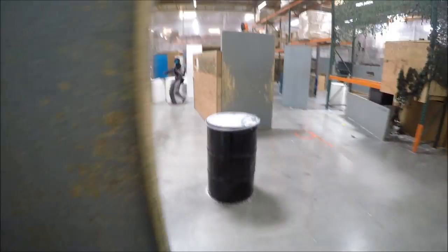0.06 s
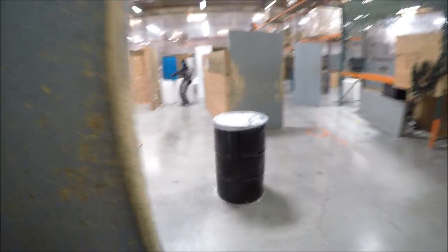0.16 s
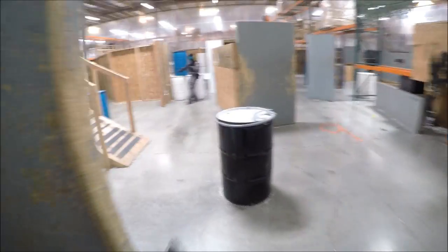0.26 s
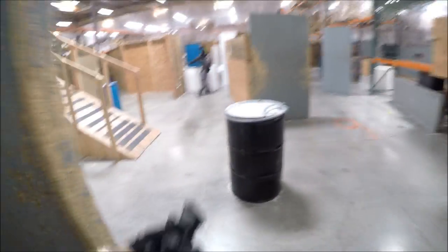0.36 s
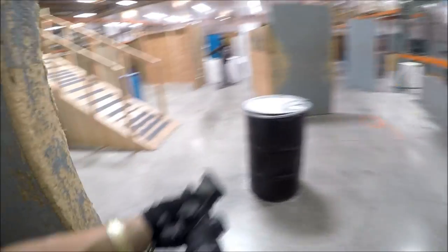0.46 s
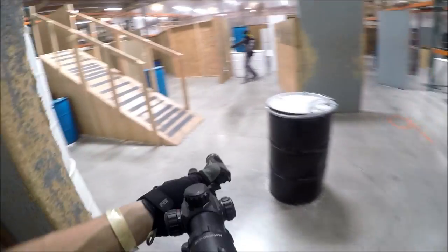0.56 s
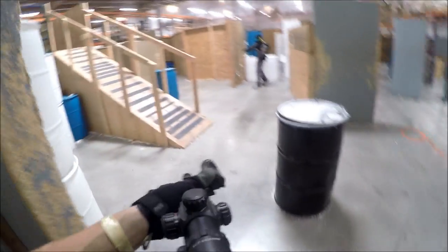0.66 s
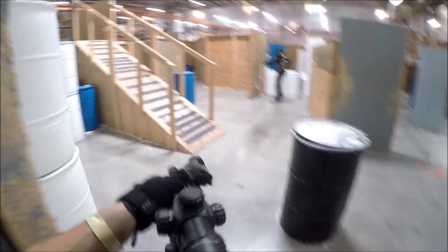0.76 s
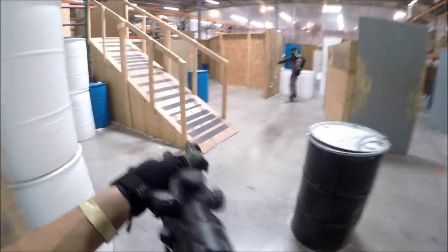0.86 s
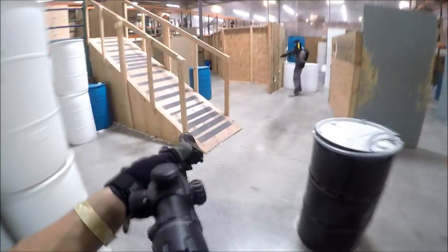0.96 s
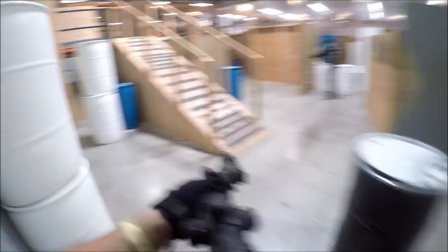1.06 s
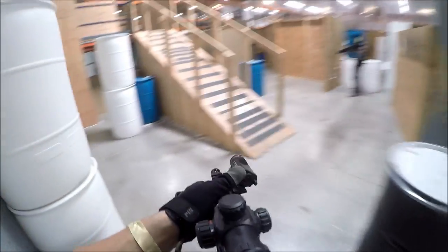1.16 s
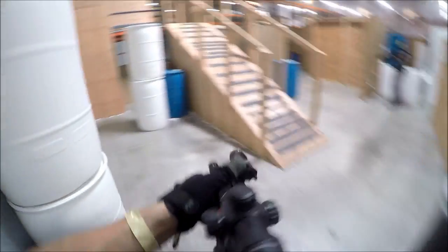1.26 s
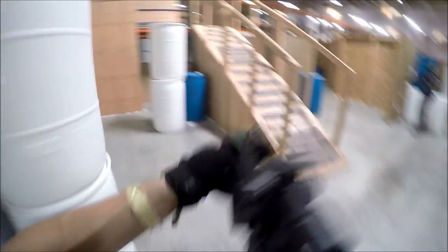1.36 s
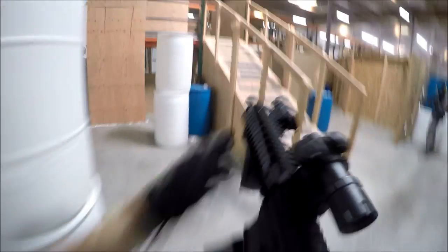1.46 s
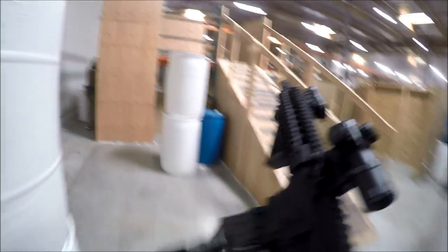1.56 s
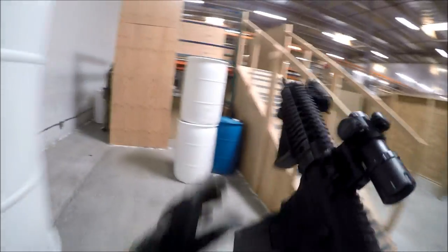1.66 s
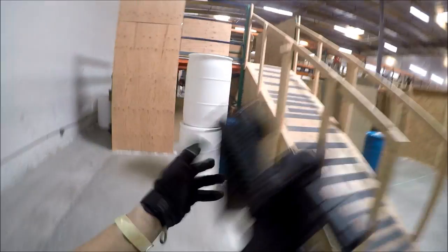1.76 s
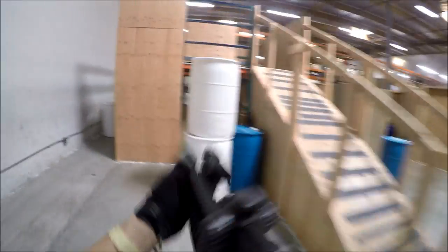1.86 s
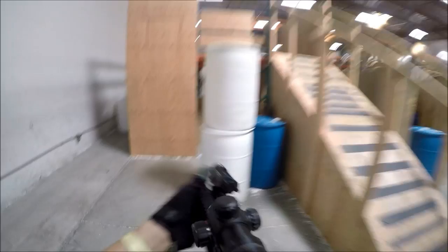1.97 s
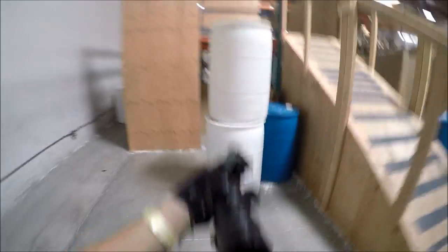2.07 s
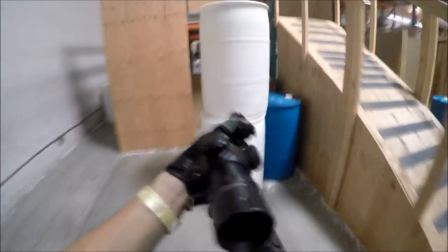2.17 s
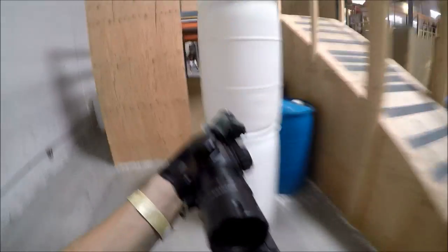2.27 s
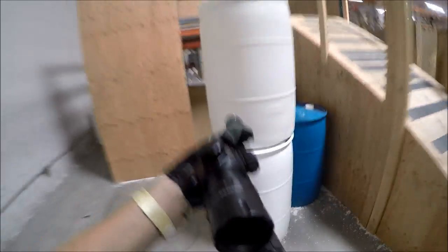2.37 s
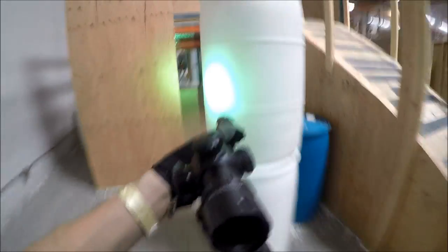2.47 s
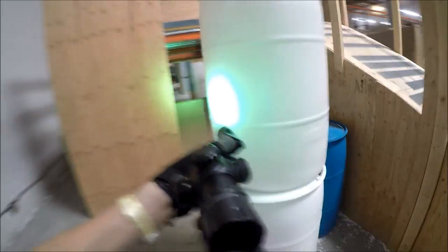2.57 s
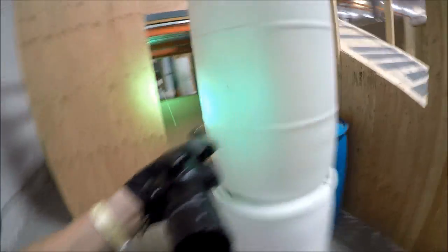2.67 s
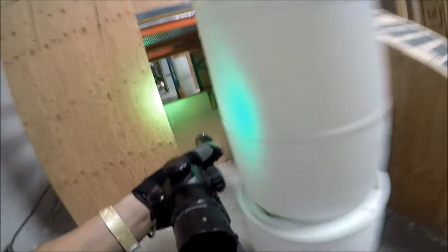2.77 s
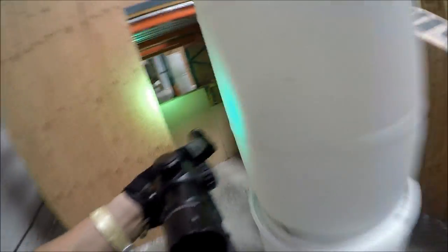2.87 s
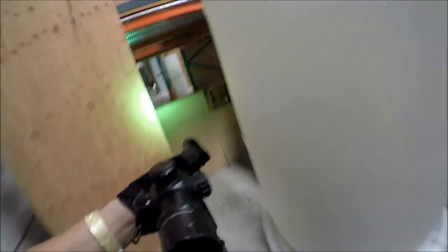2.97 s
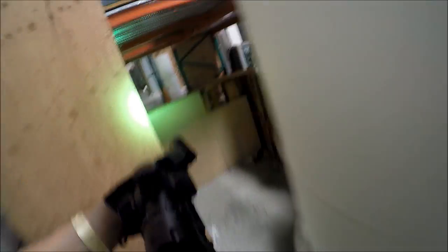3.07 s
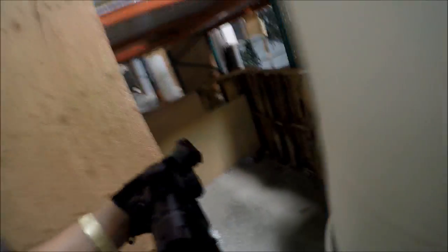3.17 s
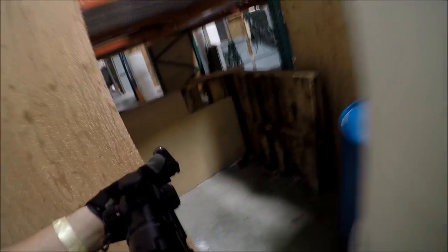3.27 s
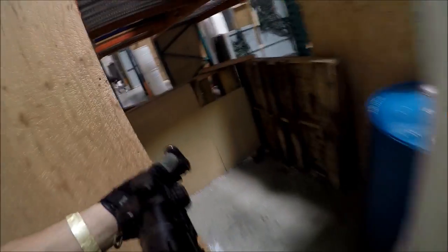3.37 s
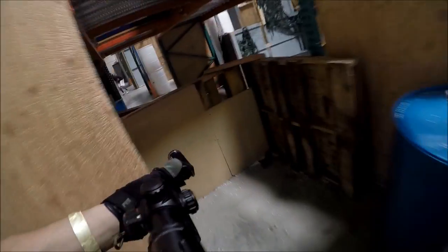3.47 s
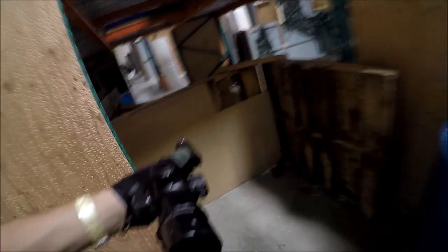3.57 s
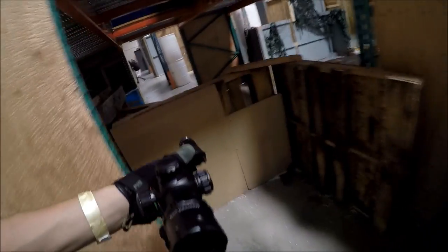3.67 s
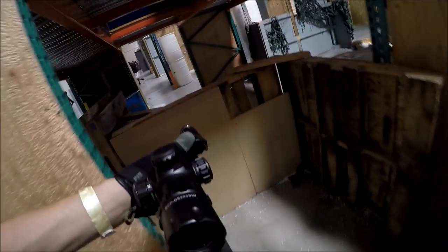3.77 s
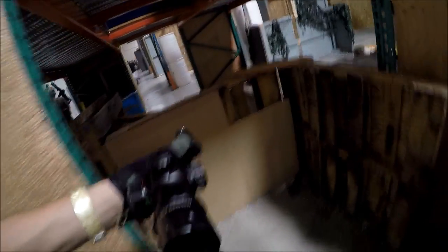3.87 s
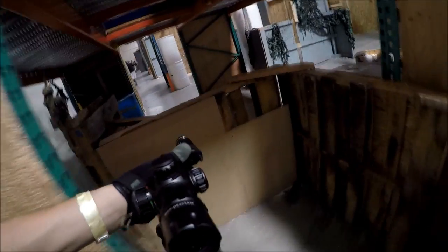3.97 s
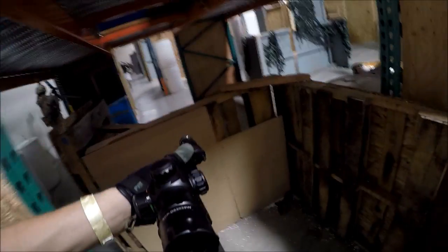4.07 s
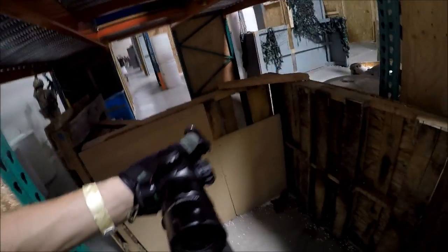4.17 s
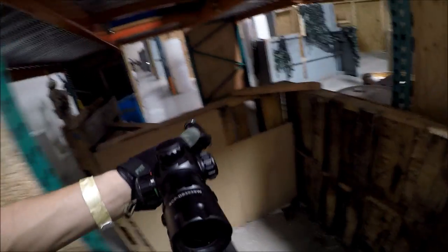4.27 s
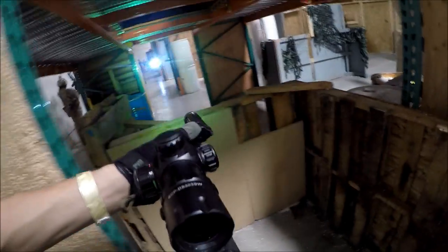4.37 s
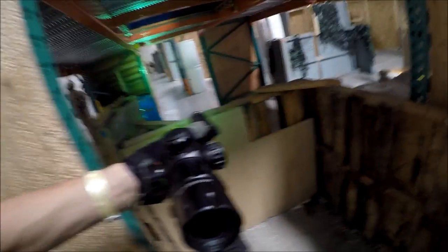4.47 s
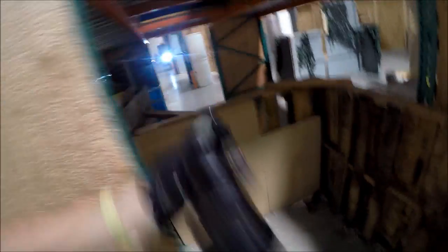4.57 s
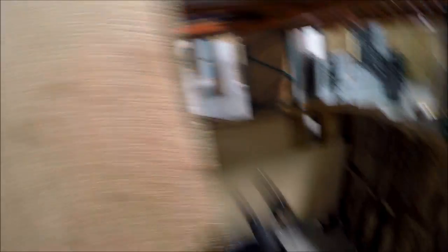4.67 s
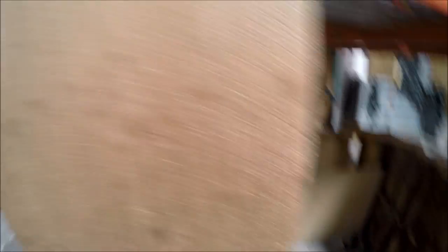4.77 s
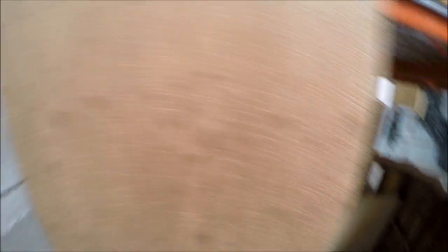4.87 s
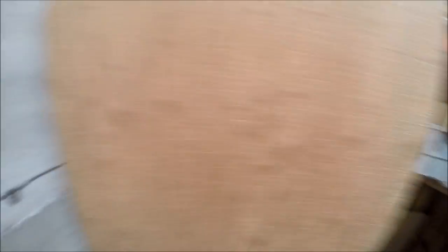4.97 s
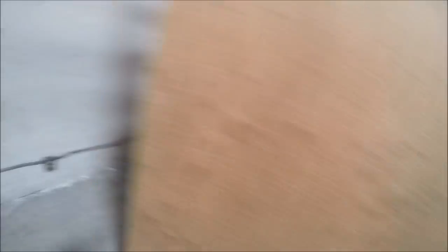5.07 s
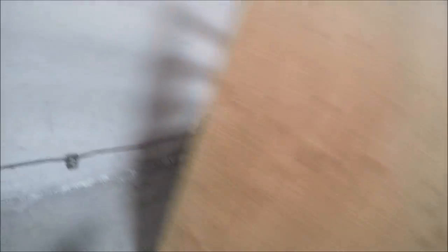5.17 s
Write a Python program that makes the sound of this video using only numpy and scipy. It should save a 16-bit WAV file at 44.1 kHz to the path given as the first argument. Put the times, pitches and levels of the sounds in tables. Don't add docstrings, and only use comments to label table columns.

```python
import sys
import numpy as np
from scipy import signal
from scipy.fft import rfft, irfft, next_fast_len
from scipy.io import wavfile
from scipy.ndimage import uniform_filter1d

SR = 44100
rng = np.random.default_rng(int(sys.argv[2]) if len(sys.argv) > 2 else 0)


def volts_from_decibels(level):
    exponent = np.asarray(level, float) / 20
    return 10 ** exponent


def pcm_store(signal):
    levels = np.round(np.clip(np.atleast_2d(signal), -1, 1) * 32767)
    wavfile.write(sys.argv[1], SR, levels.astype(np.int16).T)


N = 229747

# (frequency [Hz], level [dB])
HALL_COLOUR = [(88, -28), (150, -8.5), (361, -9.5), (624, -8.5), (888, -8.5), (960, -9), (1550, -8.5),
               (1800, -1.5), (2360, 3), (2920, -3.5), (3160, -1.5), (3800, -7), (4050, -16), (5000, -22.5),
               (12700, -34), (14500, -31), (16000, -60)]
# (frequency [Hz], time to fall 60 dB [s])
HALL_T60 = [(400, 2.3), (1000, 6.5), (3000, 5.3), (6000, 2.35), (9000, 2.45), (15000, 0.13)]
# (frequency [Hz], level [dB])
TAIL_COLOUR = [(180, -48), (300, -17.5), (701, -15.5), (856, -5), (1300, -14), (1780, -0.5), (2360, -2),
               (3460, 6), (4160, -7), (7080, -14), (7950, -18.5), (9090, -18), (13800, -16.5), (15000, -20),
               (16000, -25)]
# (top time [s], level [dB], rise time [s], hollow echo over level [dB])
FAR_FIRE = [(0.0, -45.5, 0.02, -2.5), (0.066, -48, 0.021, -1), (0.75, -54, 0.56, -7),
            (1.092, -49, 0.16, -7), (1.5, -48.5, 0.022, -16), (1.587, -42.5, 0.011, 0.5),
            (1.82, -72, 0.033, -24), (1.92, -53, 0.04, -26), (2.305, -44.5, 0.018, -2.5),
            (2.43, -49, 0.15, -5.5), (3.34, -39.5, 0.083, -3.5), (3.58, -40, 0.17, -6),
            (3.814, -45.5, 0.012, 0), (3.896, -39, 0.071, -10.5), (4.018, -41.5, 0.068, -6),
            (4.15, -49.5, 0.12, -10), (4.33, -54.5, 0.69, -5), (4.913, -37.5, 0.016, -13),
            (5.08, -38.5, 0.11, -6.5), (5.19, -54, 0.1, -15)]
# (frequency [Hz], level [dB])
FAR_FIRE_COLOUR = [(880, -25), (1500, -12.5), (1770, 0.5), (2890, 3), (3400, 6.5), (4120, -9.5),
                   (5200, -13), (6680, -15), (7940, -29.5), (11000, -26.5), (15000, -66)]
# (top time [s], level [dB], rise time [s])
RUB = [(0.06, -67, .02), (0.27, -72, .012), (0.97, -62.5, 0.11), (1.12, -60, 0.037), (1.392, -62, 0.0056),
       (1.5, -61, 0.033), (1.553, -53.5, 0.0074), (1.585, -65, 0.013), (1.71, -61.5, 0.0067),
       (1.806, -64, 0.0024), (1.813, -46, 0.0012), (1.821, -69, 0.004), (1.835, -58, .003),
       (1.85, -65, 0.049), (1.875, -61, .003), (1.888, -58, .004), (1.912, -52, .002), (1.918, -52, .003),
       (1.928, -53, 0.0035), (1.938, -52, 0.0027), (1.947, -52, .002), (1.953, -52, .002),
       (1.972, -52, .002), (1.99, -56.5, .002), (2.305, -58.5, .015), (2.42, -63.5, 0.11),
       (3.58, -63, 0.086), (3.815, -65, 0.0098), (3.901, -72, 0.062), (4.03, -75, 0.034), (4.8, -77, .03),
       (4.917, -44.5, 0.029), (5.08, -60.5, 0.071), (5.2, -62, 0.033)]
# (frequency [Hz], level [dB])
RUSTLE_COLOUR = [(3000, 7), (6500, 15), (8000, -3), (10500, 10.5), (12500, 4.5), (14000, -4), (15500, -3)]
# (start [s], end [s], frequency [Hz], level [dB])
SQUEAK = [
    (-0.1, 0.253, 3810, -54),
    (1.416, 1.483, 2262, -41.5),
    (1.528, 1.575, 2205, -43),
    (1.69, 1.77, 2220, -44),
    (3.904, 4.218, 905, -52),
]
# (top time [s], level [dB], rise time [s])
SWAY = [(0.038, -22, 0.047), (0.27, -29, 0.068), (0.4, -28.5, 0.1), (0.8, -24, 0.064), (0.93, -25.5, 0.072),
        (1.04, -24.5, 0.13), (1.187, -20, 0.034), (1.38, -39, 0.31), (1.62, -18.5, 0.085),
        (1.99, -23, 0.11), (2.2, -23, 0.054), (2.289, -14, 0.045), (2.477, -21, 0.061), (2.68, -22.5, 0.11),
        (2.8, -15.5, 0.036), (2.95, -19.5, 0.068), (3.08, -23.5, 0.13), (3.36, -20, 0.086),
        (3.6, -22.5, 0.096), (3.747, -19.5, 0.018), (3.84, -27, 0.037), (3.991, -23, 0.064),
        (4.105, -20.5, 0.016), (4.25, -31.5, 0.081), (4.53, -24, 0.071), (4.658, -25.5, 0.021),
        (4.783, -24.5, 0.072), (4.961, -17.5, 0.043), (5.15, -28.5, 0.28)]
# (top time [s], level [dB])
JOLT = [(0.04, -39), (0.25, -54), (0.36, -44), (0.47, -48), (0.59, -41), (0.72, -39), (0.79, -31.5),
        (1.04, -30), (1.139, -28), (1.19, -34.5), (1.59, -33), (1.66, -35.5), (1.77, -46), (1.88, -34),
        (1.99, -41), (2.259, -16.5), (2.33, -30), (3.268, -25), (3.361, -24), (3.49, -30), (3.6, -37),
        (3.806, -21), (3.95, -33), (4.03, -31.5), (4.12, -33.5), (4.245, -27), (4.38, -36), (4.8, -33),
        (4.972, -31), (5.06, -37)]
# (time [s], peak [dB], pitch [Hz], upper rattle over peak [dB], thump over peak [dB])
KNOCK = [(0.5878, -29.5, 308, -2.5, -8), (1.0155, -26.5, 795, -5, -6), (1.0186, -25, 352, -25, -40),
         (1.578, -47.5, 290, 21.5, -29), (1.758, -38.5, 970, -9, -25), (2.013, -33.5, 880, 8.5, -26),
         (2.2205, -21, 513, 1.5, -10), (2.2262, -21, 790, -20, -29), (2.2325, -26, 706, 1, -17),
         (2.297, -37, 286, 13.5, -2), (2.798, -27, 686, 16, -29), (3.2472, -17, 780, -3, -17),
         (3.2664, -20.5, 1136, -47, -3.5), (3.795, -29, 825, -4, 6.5), (3.935, -29, 960, -6, -5),
         (4.6788, -28, 1060, -1, 6)]
# (time [s], peak [dB], pitch [Hz])
TICK = [(3.2668, -19.5, 1050), (4.9105, -24.5, 4910), (1.162, -36, 3430), (1.4267, -38, 4600),
        (1.579, -33, 2400), (1.393, -44, 4600), (1.501, -46, 7000), (1.513, -45, 5900), (1.518, -47, 7340),
        (1.8195, -32.5, 3700), (2.0477, -27, 3370), (3.8656, -35, 3660), (4.9083, -21, 2480),
        (4.9323, -21.5, 1740), (5.0054, -14, 3420)]
# (frequency [Hz], level [dB], time to fall 60 dB [s])
GEAR = [(390, -18, 0.046), (621, -9, 0.088), (736, 2.5, 0.021), (1000, -5, 0.019), (1140, 4, 0.019),
        (1345, -51, 0.017)]
# (time [s], peak [dB], brightness [dB per octave], thump [dB], spray over peak [dB])
PELLET = [
    (1.1109, 0, 1.5, -64, -9),
    (2.245, 2.5, 3.5, -11.5, 4),
    (4.7029, 1, 4.5, -62, -3.5),
    (4.7096, -10, -7.5, -57, -19),
]
# (frequency [Hz], level [dB], time to fall 60 dB [s])
BOARD = [(970, -7, 0.009), (1335, -24, .01), (1950, -3, 0.013), (2260, -8, 0.012), (2700, -10, 0.004),
         (3110, -5, 0.008), (3670, -7, 0.009), (5190, -15, 0.007), (6000, -16, 0.006), (7700, -19, 0.004),
         (12400, -17, 0.004)]
# (time [s], dull level [dB], bright level [dB])
REBOUND = [(2.505, -32, -45), (2.5153, -35, -42), (2.643, -21, -29), (2.655, -39, -41), (2.6684, -32, -45),
           (2.7728, -27, -30), (2.7855, -30, -33), (2.791, -35, -30), (2.8952, -33, -30), (2.905, -30, -36),
           (2.9147, -37, -26), (2.928, -28, -45), (3.036, -28, -24), (3.0446, -33, -29),
           (3.0547, -29.5, -25), (3.152, -21, -28), (3.167, -26, -23.5), (3.177, -21.5, -28),
           (4.5393, -10, -29), (4.5613, -43, -25), (4.5691, -31, -31), (4.651, -14.5, -28),
           (4.672, -34, -34), (4.688, -22, -31)]
# (frequency [Hz], level [dB], time to fall 60 dB [s])
ACTION_DULL = [(2030, -30, 0.019), (3067, -1.5, 0.029), (3720, -14, 0.022)]
# (frequency [Hz], level [dB], time to fall 60 dB [s])
ACTION_BRIGHT = [(5500, -6, .006), (7250, -8, .006), (8830, -11, .005), (12600, -6, .004),
                 (15000, -10, .005)]
# (frequency [Hz], level [dB])
LOOSE_PART = [(2150, 11), (2900, 3), (3450, 11), (4480, -5), (5500, -9), (7250, -10.5), (8830, -7),
              (12600, -2), (15000, 2)]
# (time [s], level [dB], low ring over level [dB])
SLAM = [(2.4435, -30, -9), (2.4712, -26, 0), (2.6255, -25, -4), (2.7515, -25, -9), (2.7545, -21, -3),
        (2.879, -19, -6), (3.0165, -31, -5), (3.1411, -30, -3), (2.4761, -18, 0), (2.4793, -17, -2),
        (2.4827, -16, 4), (2.4856, -18, -9), (2.4889, -15, 1), (2.631, -17.5, 11.5), (2.6336, -20, -8),
        (2.636, -7.5, -3), (2.6401, -16, -7), (2.6481, -16, -4), (2.7577, -17, 2), (2.7606, -12, -1),
        (2.7655, -19, -1), (2.7678, -17, -6), (2.8834, -11.5, -5), (2.886, -22, 2), (2.8896, -13, -2),
        (3.0223, -18, -5), (3.0256, -16, -10), (3.03, -10.5, -5), (3.0368, -24, -2), (3.1343, -28, 6),
        (3.1457, -20, 1), (3.1558, -18.5, 4), (3.1604, -20, 2), (3.1728, -26, -5), (4.5317, -31, -5),
        (4.5362, -7.5, 1), (4.5415, -16, -11), (4.5444, -21, -11), (4.5489, -24, -8), (4.5555, -27, -7),
        (4.6049, -29, 3), (4.638, -22, -7), (4.6413, -11, 6), (4.6453, -9.5, -5), (4.648, -12, -8),
        (4.6542, -17, -4), (4.6574, -15, -2), (4.6637, -27, -3), (4.724, -27, 6)]
# (frequency [Hz], level [dB], time to fall 60 dB [s], share of the low ring column [0 to 1])
SLAM_MODES = [(2160, -6, 0.01, 0.94), (2860, -11, 0.027, 0.51), (3110, -12.5, 0.024, 0.1),
              (3390, -7, 0.013, 0.01), (5600, -21, 0.0086, 0.01)]
# (time [s], level [dB], pitch [Hz])
TAP = [(0.592, -27, 337), (0.595, -34, 332), (1.158, -38, 330), (2.246, -21, 470), (2.249, -20, 292),
       (3.267, -24, 1040), (4.679, -23, 1040), (2.4449, -37, 910), (2.45, -22, 1270), (2.4593, -29, 695),
       (2.4783, -30, 1000), (2.4831, -22, 1110), (2.5992, -32, 1100), (2.6053, -24, 786), (2.617, -36, 800),
       (2.6321, -19.5, 1010), (2.6377, -23, 1000), (2.6456, -32, 800), (2.7305, -23.5, 904),
       (2.7331, -38, 690), (2.7561, -36, 810), (2.8545, -18.5, 726), (2.861, -31, 680), (2.8681, -35, 900),
       (2.8813, -28, 905), (2.9952, -32, 900), (2.9993, -30, 740), (3.0221, -23.5, 1080), (3.026, -41, 800),
       (3.0295, -29, 1000), (3.1176, -22, 800), (3.1255, -25, 750), (3.1449, -17.5, 775),
       (3.1508, -21, 720), (4.5044, -24, 1000), (4.5083, -47, 800), (4.532, -42, 970), (4.613, -38, 920),
       (4.6163, -33, 695), (4.6394, -35, 1000), (4.7195, -32, 900)]
# (time [s], peak [dB], thump [dB], leak over peak [dB],
# clack over peak [dB])
VALVE = [
    (2.448, -12, -20, -11, -8),
    (2.6026, -13, -16.5, -8.5, -7.5),
    (2.728, -13.5, -18.5, -10, -11),
    (2.8513, -15, -19, -5.5, -7),
    (2.9922, -14, -16.5, -9, -6.5),
    (3.1152, -15, -18, -8, -6),
    (4.465, -17, -44, -4, -42),
    (4.5019, -13.5, -23.5, -12, -15),
    (4.61, -15, -23.5, -5, -11),
]
# (frequency [Hz], level [dB])
VALVE_COLOUR = [(180, -59), (300, -25), (614, 3), (1480, -15), (2100, 11.5), (4910, 2), (7320, -3),
                (8360, -17), (12700, -7.5), (15000, -25), (16000, -40)]
# (time [s], peak [dB], muzzle crack over peak [dB], swell time [s], thump [dB])
BLAST = [
    (2.478, -9, 4, 0.0079, -24),
    (2.6324, -10, 12.5, 0.005, -24),
    (2.7583, -9.5, 17.5, 0.0078, -25),
    (2.8818, -11, 19, 0.0095, -27),
    (3.0226, -10, 16.5, 0.0061, -25),
    (3.1454, -10, 16.5, 0.0069, -22.5),
    (4.5314, -7, 6.5, 0.0098, -31.5),
    (4.6404, -7, 11.5, 0.009, -30),
]
# (frequency [Hz], level [dB])
BLAST_COLOUR = [(180, -10), (300, -37), (425, -22), (1480, -13.5), (2140, 2), (2480, -2), (3460, 3.5),
                (4160, -4), (5700, -3.5), (8090, -11.5), (8790, -13.5), (9710, -13.5), (13300, -8.5),
                (15000, -8), (16000, -13)]
# (resonance [Hz], width [Hz], level of the added resonance [dB])
PORT = [(5500, 400, -4), (7200, 300, -2), (8800, 400, -2), (12600, 600, -5), (15000, 300, 4)]


def rms_one(x):
    return x / np.sqrt(np.mean(x ** 2) + 1e-20)


def at_hz(points, hz):
    table_hz, value = np.transpose(points)
    return np.interp(np.log(hz), np.log(table_hz), value)


def lowpass(x, order, hz):
    return signal.sosfilt(signal.butter(order, hz, fs=SR, output="sos"), x)


def highpass(x, order, hz):
    return signal.sosfilt(signal.butter(order, hz, "high", fs=SR, output="sos"), x)


def clicks(times, heights):
    out = np.full(N, 1e-18)
    at = (np.asarray(times) * SR).astype(int)
    np.add.at(out, np.clip(at, 0, N - 1), heights)
    return out


def fade(x, t60):
    return signal.lfilter([1], [1, -volts_from_decibels(-60 / (t60 * SR))], x)


def ring(x, hz, t60):
    r = volts_from_decibels(-60 / (t60 * SR))
    w = 2 * np.pi * hz / SR
    return signal.lfilter([0, np.sin(w)], [1, -2 * r * np.cos(w), r * r], x)


def noise(colour):
    size = next_fast_len(N, True)
    hz = np.maximum(np.arange(size // 2 + 1) * SR / size, 1)
    spectrum = rfft(rng.standard_normal(size)) * volts_from_decibels(at_hz(colour, hz))
    return rms_one(irfft(spectrum, size)[:N])


def flicker(rate_hz, depth_db):
    r = np.exp(-2 * np.pi * rate_hz / SR)
    slow = signal.lfilter([1], [1, -2 * r, r * r], rng.standard_normal(N + SR))[SR:]
    return volts_from_decibels(depth_db * rms_one(slow))


def swells(top_s, level_db, rise_s, rest_db=-100):
    t = np.arange(0, N + 64, 64) / SR
    rise_s = np.clip(rise_s + 0 * top_s, .002, 1)
    u = np.maximum(1 + (t - np.c_[top_s]) / np.c_[rise_s], 0)
    shape = (u * np.exp(1 - u)) ** 4
    power = volts_from_decibels(2 * rest_db) + np.sum(volts_from_decibels(2 * np.c_[level_db]) * shape, axis=0)
    return np.interp(np.arange(N) / SR, t, np.sqrt(power))


def swing(colour, slack):
    x = noise(colour)
    height = np.abs(signal.hilbert(x, next_fast_len(N))[:N])
    return rms_one(x / (height + slack))


def thump(times, level_db, hz, t60):
    soft = signal.lfilter([.02], [1, -.98], clicks(times, volts_from_decibels(level_db)))
    return ring(soft, hz, t60)


def clack(times, level_db, length_s, tilt_db=0.):
    scatter_db = rng.normal(0, 2.5, (len(times), len(GEAR)))
    contacts = rng.standard_normal(N) * (rng.random(N) < 900 / SR)
    out = 0
    for k, (hz, mode_db, t60) in enumerate(GEAR):
        height_db = level_db + mode_db + scatter_db[:, k] + tilt_db * np.log2(hz / 600)
        blow = clicks(times, volts_from_decibels(height_db))
        out = out + ring(blow + .5 * fade(blow, length_s) * contacts, hz, t60)
    return out


def hall():
    fan_hz, fan_db, nearest_s = 222, -65.5, 1.5
    hum = np.sin(2 * np.pi * fan_hz * np.arange(N) / SR) * flicker(2.5, 0.85)
    hum = hum * swells(np.array([nearest_s]), np.array([fan_db]), 0.94, fan_db - 3.5)
    wash = highpass(noise(HALL_COLOUR), 2, 170)
    return volts_from_decibels(-47) * rms_one(wash) * flicker(7.2, 1.0) + hum


def far_fire():
    s, far_db, rise_s, hollow_db = np.transpose(FAR_FIRE)
    hollow_hz, hollow_t60_s = 1177, 0.0048
    once = ring(rng.standard_normal(N), hollow_hz, hollow_t60_s)
    boards = rms_one(ring(once, hollow_hz, hollow_t60_s))
    direct = swells(s, far_db + 2.5, rise_s) * noise(FAR_FIRE_COLOUR)
    echo = swells(s, far_db + hollow_db, 1.04 * rise_s) * boards
    return (direct + echo) * flicker(42, 1.33)


def rustle():
    return swells(*np.transpose(RUB)) * noise(RUSTLE_COLOUR) * flicker(60, 3) * flicker(500, 5.5)


def squeaks():
    wander = .022
    t, out = np.arange(N) / SR, 0
    for start, end, hz, level_db in SQUEAK:
        swell = np.sin(np.pi * np.clip((t - start) / (end - start), 0, 1))
        drift = wander * np.cumsum(rng.standard_normal(N))
        out = out + volts_from_decibels(level_db) * swell * np.sin(2 * np.pi * hz * t + drift)
    return out


def shake():
    deep = swing([(10, -2.5), (21, 17.0), (28, 17.5), (36, 12.5), (55, -36), (300, -120)], slack=0.37)
    upper = swing([(10, -65), (38, -23.0), (50, 7.0), (75, -7.5), (110, -14.0), (150, -18.5),
                   (260, -41.5), (1000, -110)], slack=0.34)
    shot_s, _, _, _, shot_thump_db = np.transpose(BLAST)
    steps = swells(*np.transpose(JOLT), 0.021, rest_db=-46)
    recoil = swells(shot_s, shot_thump_db + 1.5, 0.029)
    sway = swells(*np.transpose(SWAY), rest_db=-43)
    return lowpass(sway * deep + volts_from_decibels(-1.0) * (steps + recoil) * upper, 4, 320)


def knocks():
    s, peak_db, _, upper_db, low_db = np.transpose(KNOCK)
    rattle = noise([(1200, -58), (1800, -3), (2300, 4.0), (3200, -24.0), (9000, -26), (20000, -80)])
    out = clack(s + 0.001, peak_db - 13.0, 0.03, tilt_db=0.5)
    out += thump(s, peak_db + low_db + 9.5, 123.0, 0.045)
    out += fade(clicks(s, volts_from_decibels(peak_db + upper_db - 9.5)), 0.036) * rattle
    for s, peak_db, hz, *_ in KNOCK:
        heights = volts_from_decibels(peak_db + np.array([-6., -10])) * [1, -1]
        out += ring(clicks([s + 0.00058, s + 0.00335], heights), hz, 0.025)
    return lowpass(out, 2, 3400)


def ticks():
    s, peak_db, _ = np.transpose(TICK)
    out = fade(clicks(s, volts_from_decibels(peak_db - 15)), 0.075) * noise(FAR_FIRE_COLOUR)
    for s, peak_db, hz in TICK:
        out += ring(clicks([s, s + 0.0025], volts_from_decibels(peak_db + np.array([-7., -10]))), hz, 0.022)
    return out


def board_bend():
    from_hz, to_hz, fall_s, rise_s = 4300, 2050, 0.00047, 0.00075
    t = np.arange(180) / SR
    turns = np.cumsum(to_hz + (from_hz - to_hz) * np.exp(-t / fall_s)) / SR
    return t / rise_s * np.exp(1 - t / rise_s) * np.sin(2 * np.pi * turns)


def pellets():
    s, peak_db, bright_db, thump_db, spray_db = np.transpose(PELLET)
    out = fade(clicks(s + 0.00057, volts_from_decibels(peak_db + spray_db - 7)), 0.0028) * noise(BLAST_COLOUR)
    scatter_db = rng.normal(0, 1, (len(s), len(BOARD)))
    for k, (hz, level_db, t60) in enumerate(BOARD):
        tilt_db = bright_db * np.log2(hz / 2200)
        height = volts_from_decibels(peak_db + level_db - 10.0 + scatter_db[:, k] + tilt_db)
        first = clicks(s + 0.00041, -.3 * height)
        second = clicks(s + 0.00045 + 1.1 / hz, height)
        out += ring(first + second, hz, t60)
    cavity = fade(clicks(s + 0.0059, volts_from_decibels(peak_db - 42.5)), 0.057) * rng.standard_normal(N)
    out += ring(cavity, 2280, 0.010)
    out += np.convolve(clicks(s + .0003, volts_from_decibels(peak_db - 4.5)), board_bend())[:N]
    body = clack(s, thump_db - 21, 0.012, tilt_db=-6.) - thump(s + 0.0015, thump_db + 11, 60, 0.08)
    return highpass(out, 3, 750) + body


def drum():
    return ring(clicks([3.15], volts_from_decibels(-30)), 860, .17)


def reverberation():
    s, peak_db = np.transpose(BLAST)[:2]
    energy = clicks(s + 0.014, volts_from_decibels(2 * peak_db))
    near = volts_from_decibels(-39.0) * fade(energy, 0.21)
    size = next_fast_len(N, True)
    spectrum = rfft(noise(TAIL_COLOUR), size)
    hz = np.arange(size // 2 + 1) * SR / size
    edges = np.geomspace(250, 17000, 17)
    out = 0
    for low, high in zip(edges, edges[1:]):
        band = irfft(spectrum * ((hz >= low) & (hz < high)), size)[:N]
        t60 = at_hz(HALL_T60, np.sqrt(low * high))
        far = fade(energy, t60 / 2) - fade(energy, 0.021)
        out = out + band * np.sqrt(near + volts_from_decibels(-65.5) * np.abs(far)) * flicker(5.5, 3.1)
    return out


def clatter():
    s, peak_db = np.transpose(BLAST)[:2]
    contacts = rng.standard_normal(N) * (rng.random(N) < 1300 / SR)
    hits = contacts * fade(clicks(s + 0.0019, volts_from_decibels(peak_db - 11)), 0.041)
    part = rng.integers(0, len(LOOSE_PART), N)
    out = 0
    for k, (hz, level_db) in enumerate(LOOSE_PART):
        out = out + ring(volts_from_decibels(level_db) * hits * (part == k) + 1e-18, hz, .015)
    return out


def rebounds():
    s, dull_db, bright_db = np.transpose(REBOUND)
    modes = [(mode, dull_db) for mode in ACTION_DULL] + [(mode, bright_db) for mode in ACTION_BRIGHT]
    scatter_db = rng.normal(0, 3, (len(s), len(modes)))
    out = 0
    for k, ((hz, mode_db, t60), level_db) in enumerate(modes):
        out = out + ring(clicks(s, volts_from_decibels(level_db + mode_db + scatter_db[:, k])), hz, t60)
    return out


def slams():
    s, level_db, low_db = np.transpose(SLAM)
    s = s - .0007
    scatter_db = rng.normal(0, 2, (len(s), len(SLAM_MODES)))
    out = 0
    for k, (hz, mode_db, t60, share) in enumerate(SLAM_MODES):
        height_db = level_db + mode_db + share * low_db
        first = clicks(s, volts_from_decibels(height_db + scatter_db[:, k]))
        second = clicks(s + 1 / hz, volts_from_decibels(height_db - 7.5))
        out = out + ring(first + second, hz, t60)
    return highpass(out, 2, 1400)


def stock_taps():
    out, t = np.zeros(N), np.arange(SR // 40) / SR
    onset = 1 - np.exp(-t / 0.00072)
    for s, level_db, hz in TAP:
        at = int((s - .0016) * SR)
        height = volts_from_decibels(level_db + 4 - 60 * t / 0.011)
        out[at:at + len(t)] += height * onset * np.sin(2 * np.pi * hz * t)
    return out


def valve():
    s, peak_db, thump_db, leak_db, clack_db = np.transpose(VALVE)
    held = np.convolve(clicks(s - .0008, volts_from_decibels(peak_db - 8)), np.hanning(150) ** .3)[:N]
    rattle = fade(held, .012) / 70 * noise(VALVE_COLOUR) * flicker(400, 2)
    leak = fade(clicks(s + 0.004, volts_from_decibels(peak_db + leak_db - 13.5)), 0.5) * noise(TAIL_COLOUR)
    snap = ring(clicks(s, volts_from_decibels(peak_db - 17.0)), 5500, 0.0073)
    snap += ring(clicks(s, volts_from_decibels(peak_db - 16.0)), 7070, 0.006)
    snap += ring(clicks(s + 0.00154, volts_from_decibels(peak_db - 8.5)), 1985, 0.03)
    body = clack(s + 0.00247, peak_db + clack_db - 13.0, 0.13)
    return rattle + snap + leak + body - thump(s, thump_db + 8.0, 132, 0.045)


def barrel_roar():
    s, peak_db, _, swell_s, _ = np.transpose(BLAST)
    out, t = np.zeros(N), np.arange(SR // 8) / SR
    for at, top_db, rise in zip(((s - .0065) * SR).astype(int), peak_db, swell_s):
        swell = (t / rise * np.exp(1 - t / rise)) ** 2
        after = .5 * np.exp(-t / 0.015) * (1 - np.exp(-t / rise))
        out[at:at + len(t)] += volts_from_decibels(top_db - 10) * (swell + after)
    return out


def blast():
    s, peak_db, crack_db, _, thump_db = np.transpose(BLAST)
    lead = fade(uniform_filter1d(clicks(s - .0014, volts_from_decibels(peak_db - 25.0)), size=300), 0.06)
    crack = fade(uniform_filter1d(clicks(s + 0.0008, volts_from_decibels(peak_db + crack_db + 21.5)), size=110), 0.0049)
    hiss = noise(BLAST_COLOUR)
    dull = hiss - 0.85 * highpass(hiss, 1, 4000)
    jet = noise(BLAST_COLOUR)
    sharp = jet - 2.1 * lowpass(jet, 1, 4500)
    air = lead * jet + volts_from_decibels(-30) * crack * sharp + barrel_roar() * flicker(260, 1.8) * dull
    nozzle = ring(clicks(s - 0.0047, volts_from_decibels(peak_db - 15)), 7200, 0.0035)
    kick = thump(s - .004, thump_db, 44, 0.029) + thump(s, thump_db + 13.5, 110.5, 0.044)
    return air + nozzle + kick + clack(s - .001, peak_db - 24.0, 0.005)


def scene():
    surroundings = hall() + far_fire() + rustle() + squeaks() + shake()
    strikes = knocks() + ticks() + pellets() + drum()
    moving_parts = clatter() + rebounds() + slams() + stock_taps()
    shots = reverberation() + moving_parts + valve() + blast()
    return (surroundings + strikes + shots)[None]


def band_limit(x):
    return signal.sosfilt(signal.butter(12, 16500, fs=SR, output="sos"), x)


def record(dry):
    lifted = dry.copy()
    for hz, width_hz, lift_db in PORT:
        b, a = signal.iirpeak(hz, hz / width_hz, fs=SR)
        lifted += volts_from_decibels(lift_db) * signal.lfilter(b, a, dry)
    limited = np.clip(lifted, -.8, .8)
    top = signal.cheby2(10, 45, 16100, fs=SR, output="sos")
    return band_limit(signal.sosfilt(top, limited))


dry = scene()
out = record(dry)
pcm_store(out)
```